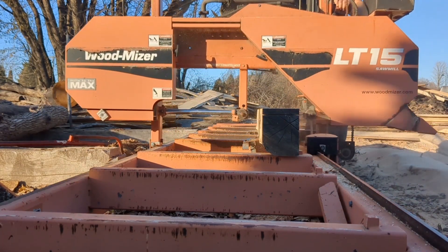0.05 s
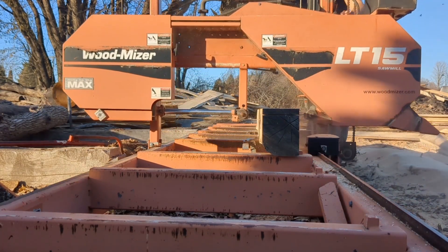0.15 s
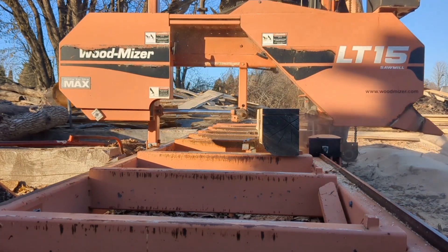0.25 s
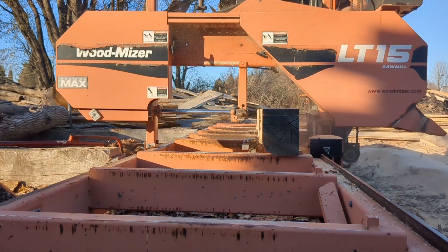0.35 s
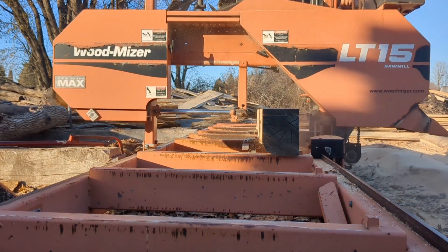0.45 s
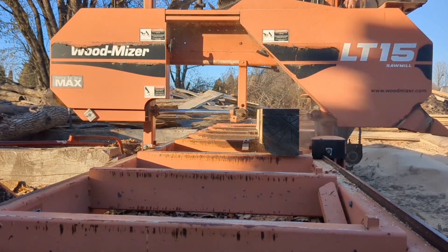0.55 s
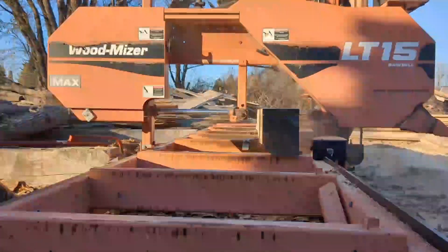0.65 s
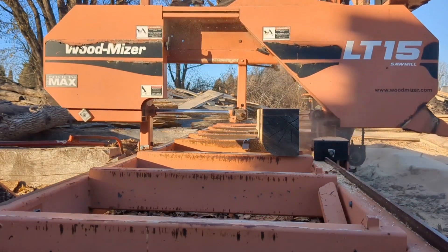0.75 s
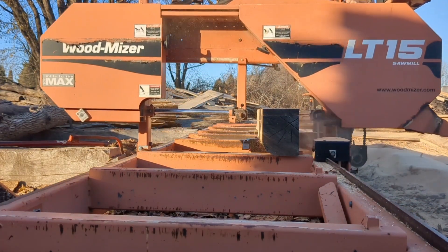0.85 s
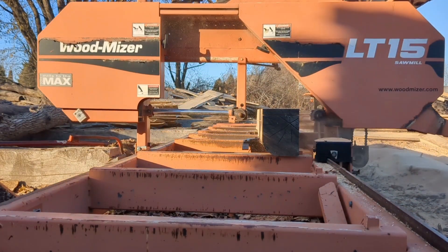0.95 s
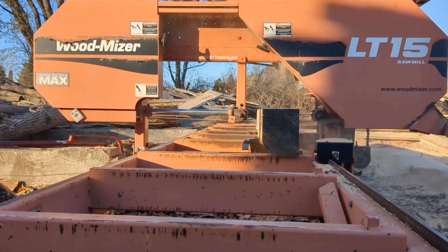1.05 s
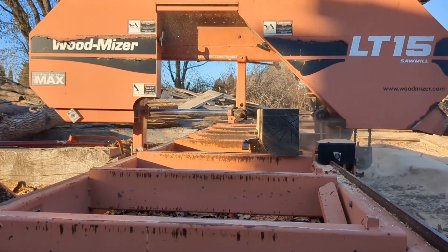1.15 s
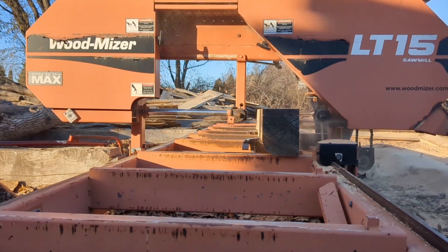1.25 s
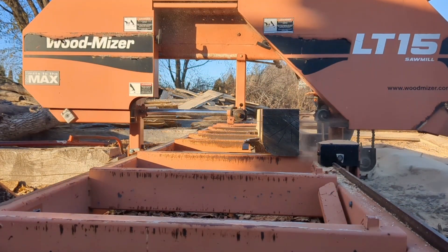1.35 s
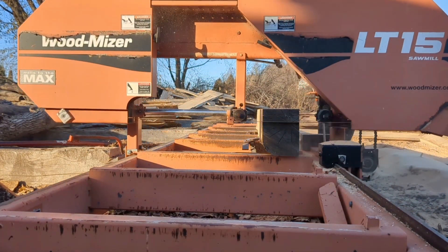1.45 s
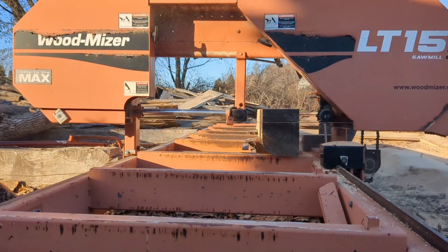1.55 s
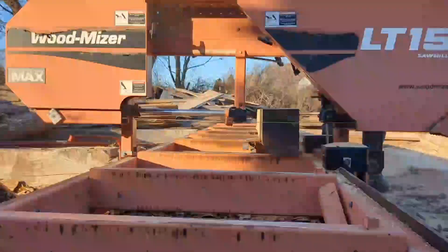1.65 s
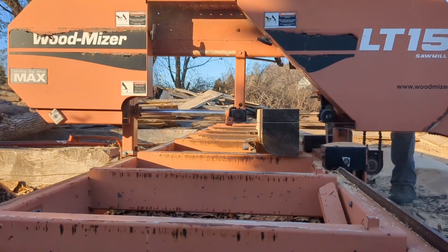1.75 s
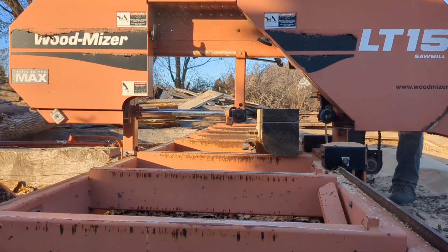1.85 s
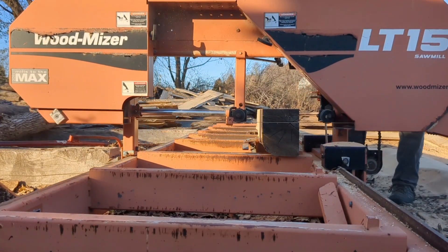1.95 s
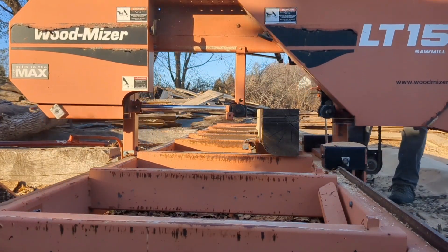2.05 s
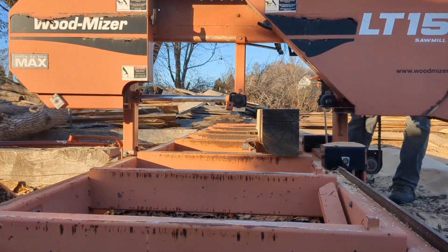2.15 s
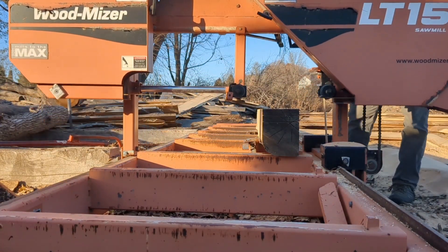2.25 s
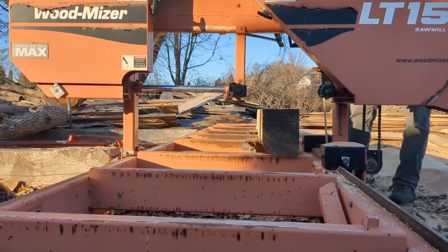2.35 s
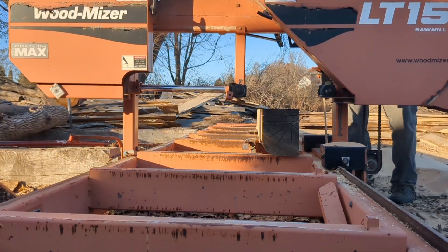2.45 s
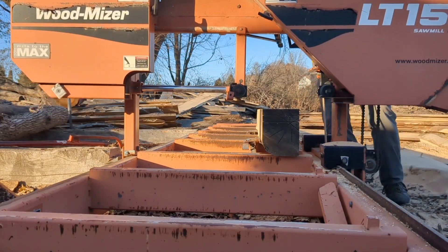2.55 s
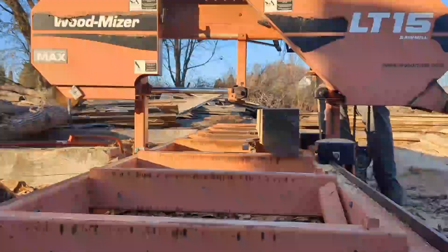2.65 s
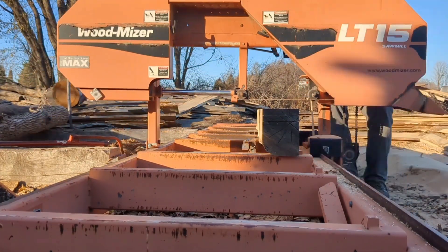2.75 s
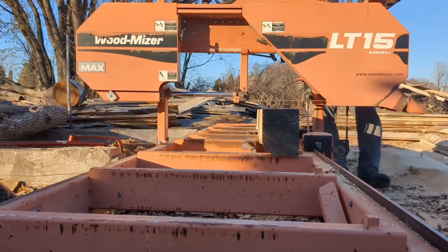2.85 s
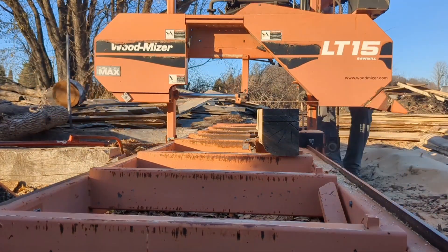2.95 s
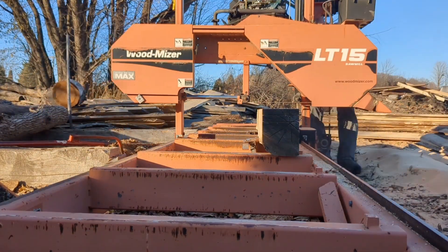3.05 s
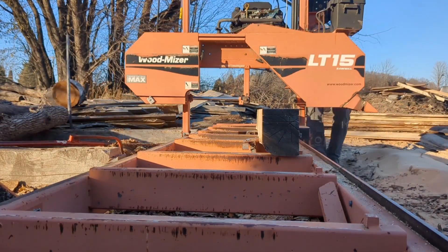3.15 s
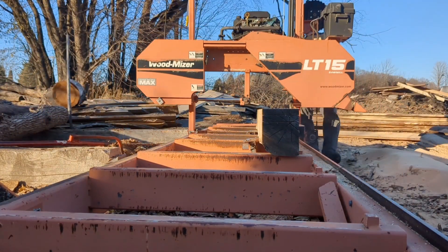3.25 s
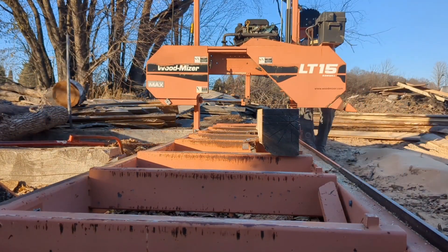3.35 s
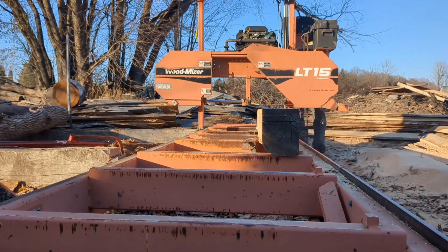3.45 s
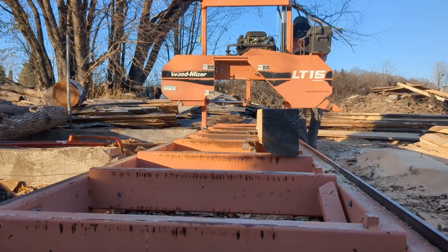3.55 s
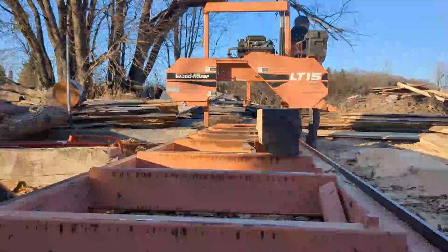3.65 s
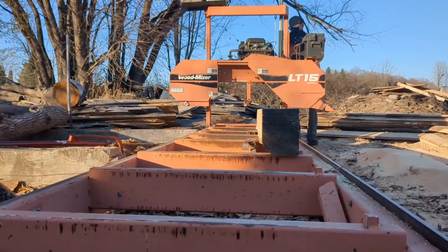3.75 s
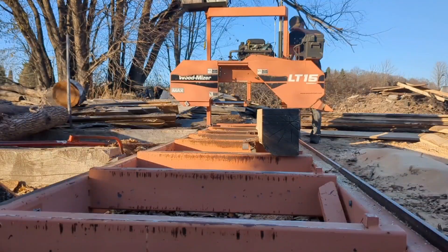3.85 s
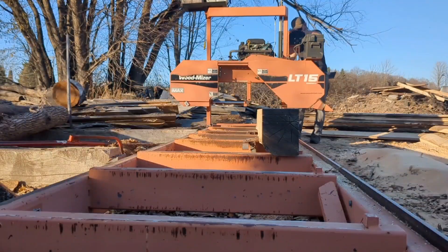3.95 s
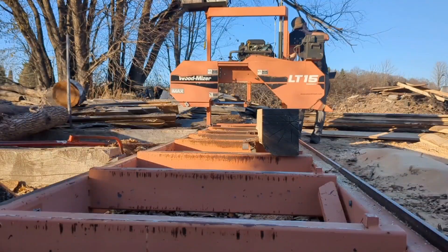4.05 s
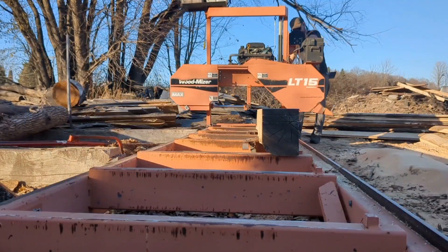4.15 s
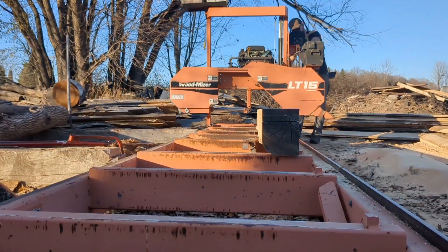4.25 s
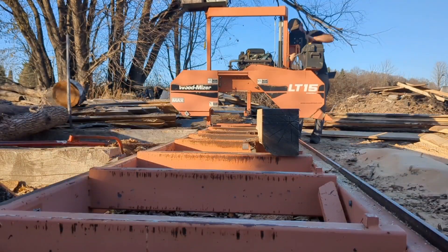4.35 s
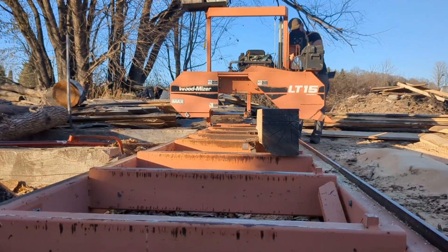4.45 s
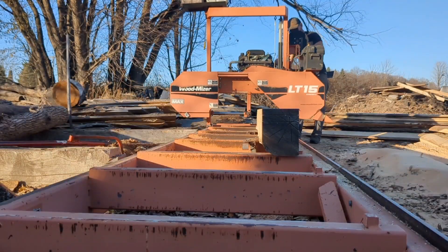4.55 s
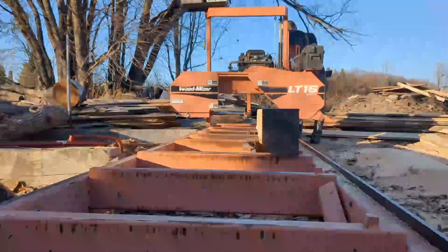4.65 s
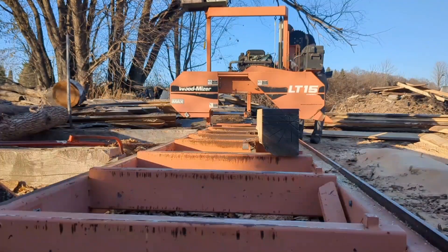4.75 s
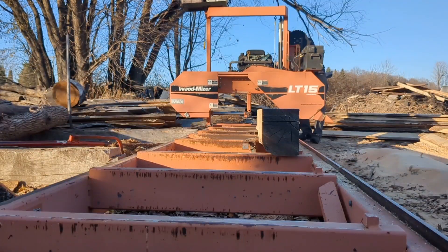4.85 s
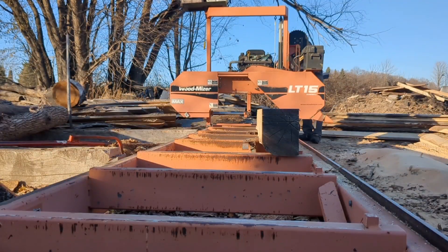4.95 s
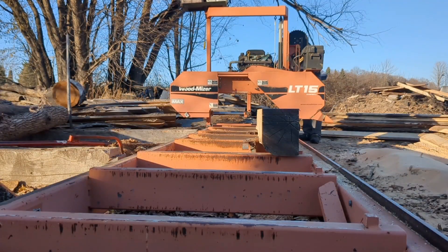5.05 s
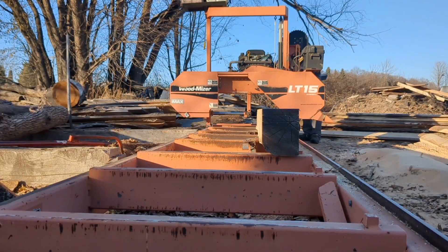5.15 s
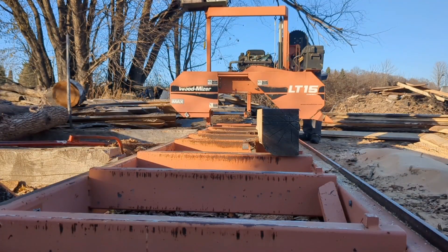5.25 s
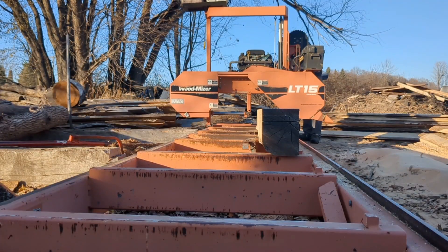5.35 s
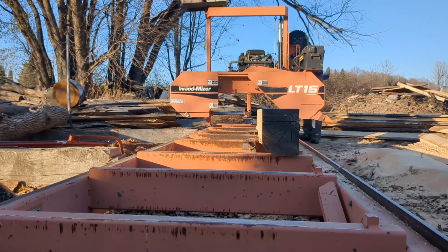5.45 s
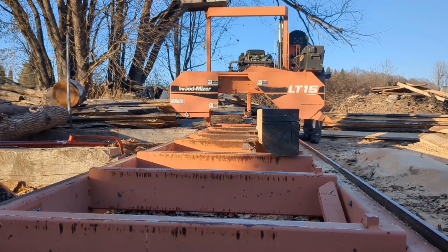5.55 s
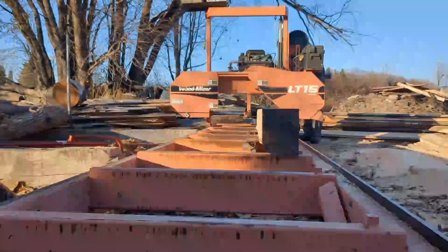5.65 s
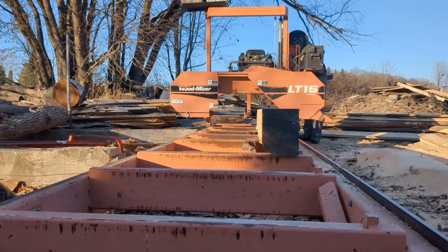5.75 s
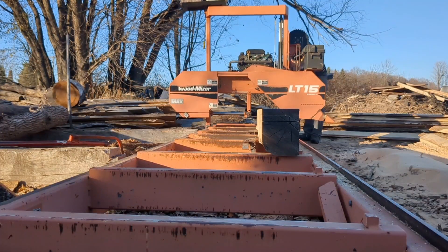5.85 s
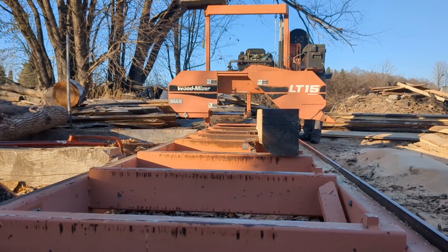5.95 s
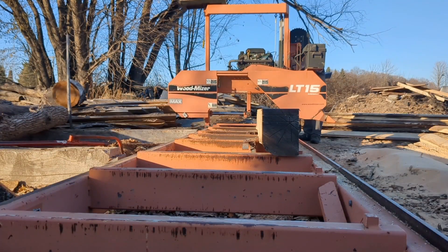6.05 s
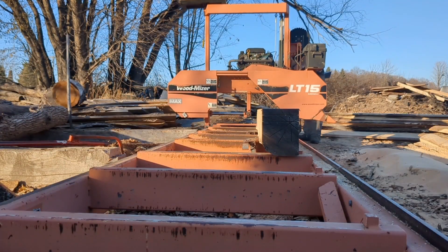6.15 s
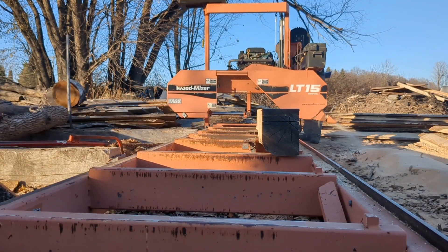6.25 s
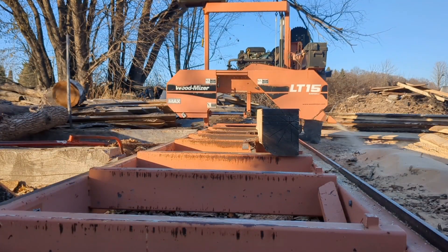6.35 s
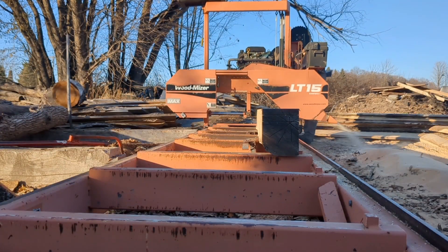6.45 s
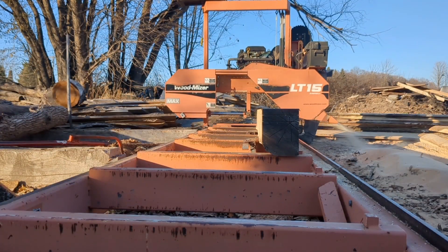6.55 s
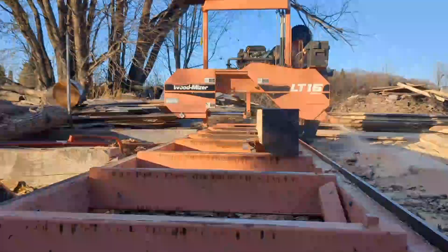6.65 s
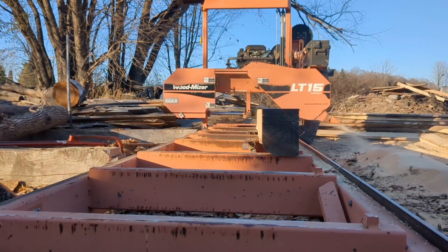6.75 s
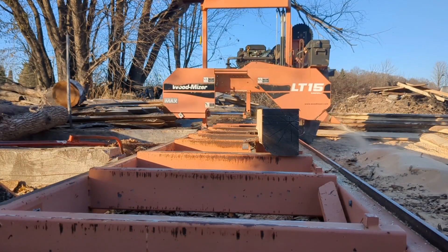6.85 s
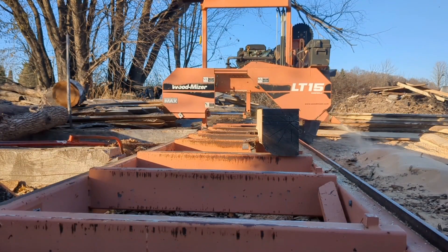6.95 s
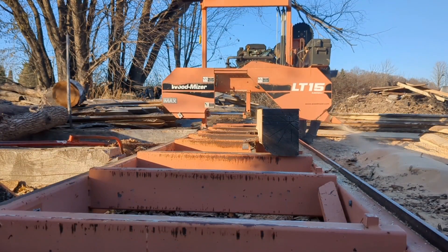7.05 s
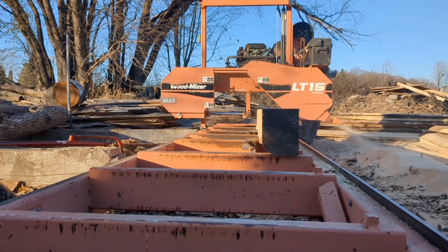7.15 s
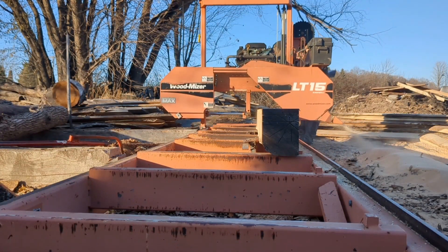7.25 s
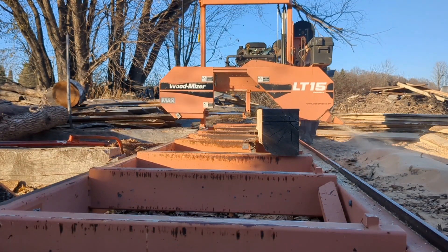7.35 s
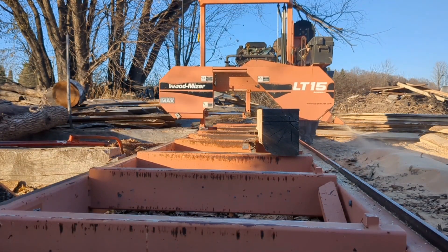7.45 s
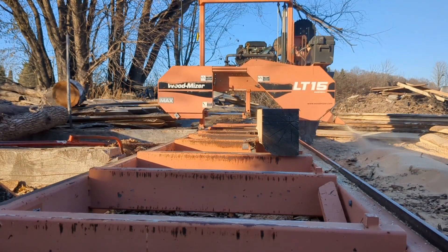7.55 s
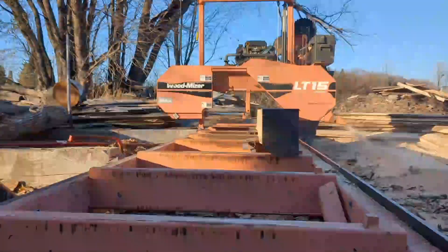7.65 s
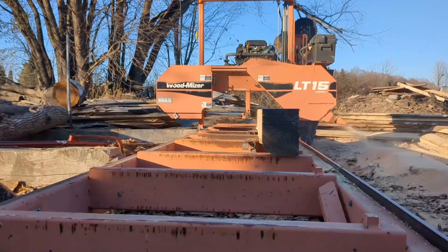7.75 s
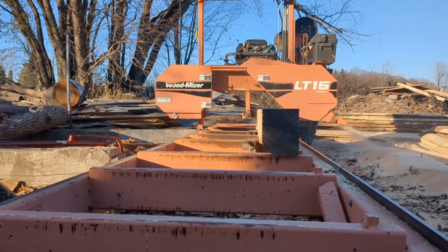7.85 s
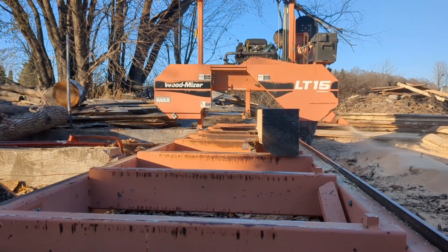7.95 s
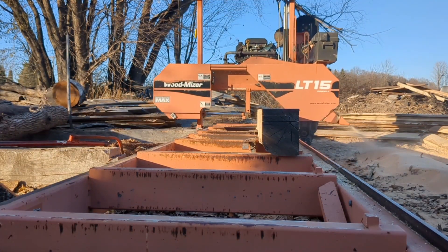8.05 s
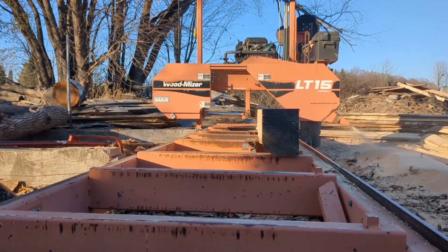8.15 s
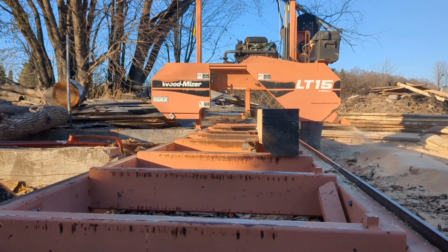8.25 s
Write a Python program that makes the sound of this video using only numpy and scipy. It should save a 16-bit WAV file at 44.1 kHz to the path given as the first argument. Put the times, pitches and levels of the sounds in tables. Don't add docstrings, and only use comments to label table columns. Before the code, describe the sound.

A steady, droning engine and bright tearing hiss of a band blade fill an open yard. After about a second and a half the cut finishes, revs fall to a throbbing idle and the blade coasts to silence with a rail rumble. A sharp metallic clack brings the throttle back up, the belt squeals as it grips, and the saw bites into wood again. Phone microphone at the log bed, slightly smeared.

```python
import sys
import numpy as np
from scipy import signal
from scipy.fft import rfft, irfft
from scipy.io import wavfile
from scipy.ndimage import uniform_filter1d

SR = 44100
rng = np.random.default_rng(int(sys.argv[2]) if len(sys.argv) > 2 else 0)


def magnitude_from_level(level_db):
    exponent = np.asarray(level_db, float) / 20
    return 10 ** exponent


def wav_out(sig):
    wavfile.write(sys.argv[1], SR, np.round(np.clip(np.atleast_2d(sig).T, -1, 1) * 32767).astype(np.int16))


N = 366471
TIME = np.arange(N) / SR
HZ = np.maximum(np.fft.rfftfreq(N, 1 / SR), 1)

HEAD_FAR_S = 4.2

# time in seconds, four-stroke cycles per second.
ENGINE_SPEED = [(0, 30.9), (.8, 30.4), (1.56, 31.2), (1.7, 29), (1.85, 25.2), (2.25, 22), (2.4, 19.5),
                (2.76, 18.7), (3.1, 19.4), (4.72, 18.9), (4.74, 27.2), (4.9, 27.4), (4.97, 30.2),
                (5.08, 29.6), (5.52, 28.4), (5.62, 31.6), (6.2, 30.4), (8.31, 30.4)]
# time in seconds, gas load in dB, valve and belt clatter in dB.
THROTTLE = [(0, -23.5, -24.5), (.4, -25.5, -31), (1.2, -26, -37), (1.45, -28, -27.5), (1.7, -28.5, -25),
            (1.9, -31, -31), (2.2, -32.5, -33.5), (2.8, -31, -29.5), (3.35, -34.5, -31), (3.8, -34.5, -36),
            (4.7, -32.5, -34.5), (4.75, -26, -27.5), (5.05, -26, -27.5), (5.17, -23, -23),
            (5.47, -23.5, -19), (5.56, -25.5, -25.5), (6.05, -24, -24.5), (8.31, -24.5, -29)]
# multiple of the cycle rate, level at full speed in dB, level at idle in dB.
LOW_ORDERS = [(2, 0.5, -14), (3, 0.5, -3.5), (5, 7.5, 8.5)]
# multiple of the cycle rate, level at full speed in dB, level at idle in dB.
HIGH_ORDERS = [(6, 0, 4.5), (7, -9, 6), (8, -7, 4), (9, -18.5, -7.5), (10, -22.5, 4), (11, -20, -6),
               (12, -16, -11.5), (13, -25.5, -9), (16, -27.5, -7.5)]
# centre in Hz, width in Hz, boost in dB.
MUFFLER = [(72.4, 10.5, 4.5), (125.4, 11.4, -11.5)]
MUFFLER_TURN = {6: .7, 7: -2.2, 8: 1.5}
SLIP_TURNS = {2: -1, 3: 1, 6: 2, 7: -1, 8: 1, 9: 3, 11: 2}
# start in seconds, end in seconds, edge in seconds, boost in dB.
SEVENTH_BOOMS = [
    (1.5, 1.75, 0.17, 10.5),
    (4.9, 5.12, .2, 9.5),
    (5.5, 6.1, 0.24, 8.5),
]
# start in seconds, end in seconds, edge in seconds, boost in dB.
OVERRUN_BOOM = [
    (1.71, 1.97, .08, 7.5),
]
# frequency in Hz, level in dB per Hz.
EXHAUST_TONE = [(20, 4), (40, -12), (70, 8), (120, 4), (170, 9.5), (215, 4), (280, -12.5), (360, -2.5),
                (480, -15.5), (700, -50)]
# frequency in Hz, level in dB per Hz.
CLATTER_TONE = [(260, -37), (450, -16.5), (856, -9), (1170, -4), (1510, -9.5), (2130, -6.5), (3430, -15.5),
                (4050, -16), (5790, -29), (11900, -31), (16000, -51)]
# start in seconds, end in seconds, edge in seconds, dB above the blade's plain rub.
CUTS = [
    (-2, 1.45, 0.17, 5.5),
    (6, 5.55, .1, 4),
    (7, 9, 0.036, 2),
    (6.5, 11, 5.4, 4.5),
]
# frequency in Hz, level in dB per Hz.
WOOD_TONE = [(410, -17), (700, -22), (886, -5), (1330, -11), (1750, -5), (2370, -8), (2560, -4),
             (3370, -6.5), (6570, -4.5), (7990, -8), (9350, -6.5), (12600, -22), (16000, -40)]
# time in seconds, whirr level in dB.
WHEEL_LEVEL = [(0, -22), (.4, -21), (1.3, -20), (2.6, -22.5), (3.12, -32), (3.66, -48), (4, -66),
               (4.9, -70), (5.05, -50), (5.16, -40), (5.37, -27.5), (5.58, -22), (6, -25), (6.1, -20),
               (8.31, -21.5)]
# frequency in Hz, level in dB per Hz.
WHIRR_NEAR_TONE = [(4650, -18), (7900, -8), (8210, -47), (8530, 2), (8920, 1.5), (10100, -4), (11100, 2),
                   (12300, -1), (13800, -11), (15100, -16), (16000, -10)]
# frequency in Hz, level in dB per Hz.
WHIRR_FAR_TONE = [(4650, -27), (7900, -7.5), (8210, -12), (8760, 4), (9350, 2.5), (10700, -4), (11300, 0.5),
                  (12600, -2.5), (13900, -14.5), (15300, -16), (16000, -21)]
# time in seconds, level in dB.
SING_LEVEL = [(0, -36), (3.1, -36.5), (3.4, -42), (3.55, -59), (5.2, -62), (5.6, -46), (6.2, -34.5),
              (8.31, -47)]
# frequency in Hz, level in dB.
SING_MODES = [(2480, -1), (3283, -8.5), (1700, -6.5)]
# time in seconds, level in dB.
RAILS_LEVEL = [(0, -25), (1.7, -23.5), (2.36, -31), (3, -22), (3.35, -21.5), (3.65, -25.5), (3.76, -36),
               (5.2, -38.5), (5.7, -29), (8.31, -28.5)]
# frequency in Hz, level in dB per Hz.
RUMBLE_TONE = [(24, -45), (40, -27), (76, -24), (102, -7), (298, -12), (407, -17.5), (615, -17),
               (772, -24.5), (1200, -35), (1560, -46.5), (2640, -120)]
# frequency in Hz, level in dB per Hz.
FRAME_TONE = [(150, -19), (260, 1.5), (355, -6.5), (450, -7.5), (530, -14.5), (700, -15.5), (900, -11.5),
              (1300, -51)]
# frequency in Hz, level in dB per Hz.
YARD_TONE = [(2500, -30.5), (4500, -1), (6000, 0), (11000, -9), (16000, -20)]
# time in seconds, crack in dB, ring over crack in dB, ring pitch in Hz.
KNOCKS = [(4.4398, -28.5, 9, 930), (4.572, -39, 3, 969), (4.605, -38, 2, 1140), (4.6902, -34, 2, 1800),
          (4.7237, -31, 4, 980), (4.7407, -22, 4, 1700), (4.752, -21, 3, 1720), (4.7615, -13.5, -6, 2140),
          (4.7794, -33, -1, 1970), (4.798, -23, 4, 2100), (4.9227, -17, -6, 920), (4.9592, -18, 3, 1170),
          (4.9744, -30, 10, 1260), (5.0444, -29, 10, 1120), (5.1306, -26, 2, 1260)]
# frequency in Hz, level in dB.
KNOCK_TONE = [(600, -30), (1500, 7.5), (5000, 0.5), (8000, -5.5), (12000, -3.5), (14000, -14), (16000, -20)]
# time in seconds, rub in dB, whirr in dB.
SLAPS = [
    (4.75, -37, -51),
    (4.924, -34.5, -41),
    (5.13, -43, -46),
]
# time in seconds, squeal pitch in Hz, level in dB.
BELT_SQUEAL = [(4.95, 1135, -34), (5.05, 1152, -33), (5.17, 1220, -24), (5.34, 1307, -26),
               (5.42, 1494, -29), (5.45, 1700, -25), (5.466, 1740, -16), (5.485, 1710, -32),
               (5.5, 1740, -52)]
# centre in Hz, width in Hz, boost in dB.
BODY_RINGS = [(1040, 26, -2), (1284, 49, 3), (1448, 49, 5), (1700, 66, 2.5), (2524, 45, 6), (8600, 39, -26),
              (8700, 110, 5), (8920, 80, -2.5), (9060, 55, 3), (9300, 150, 4.5), (10100, 170, 6),
              (10770, 100, 2.5)]
# frequency in Hz, likeness from 0 to 1.
PORT_LIKENESS = [(60, 1), (130, 1), (290, 1), (640, 0.76), (1410, 0.69), (3100, 0.66), (5000, 0.4),
                 (6820, 0.19), (9000, 0.23), (11000, 0.35), (13000, 0.6), (15000, .15)]
# frequency in Hz, left minus right in dB.
PORT_LEAN = [(60, -5), (110, 1), (200, 3), (380, 1.0), (700, -1), (1290, -0.5), (2380, -1), (4400, 1),
             (8120, -2), (15000, -17.5)]
# frequency in Hz, radians by which left leads.
PORT_LEAD = [(0, 0), (520, 0.55), (1120, -0.05), (2840, -0.8), (5430, -1.0), (6200, -4.5), (6550, 0.4),
             (8960, 0.5), (10200, 1.1), (11000, 0), (12100, -2.8), (12700, -0.5), (14800, -3), (16200, 2)]


def columns(table):
    s, *rest = np.transpose(table)
    return [np.interp(TIME, s, column) for column in rest]


def across(table, hz=HZ):
    f, value = np.transpose(table)
    return np.interp(np.log(hz), np.log(f), value)


def unit(x):
    return x / np.sqrt(np.mean(x ** 2))


def walk(rate):
    k = int(SR / rate)
    held = np.repeat(rng.standard_normal(N // k + 1), k)
    smooth = uniform_filter1d(uniform_filter1d(held, k), k)
    return unit(smooth[:N])


def spans(table):
    total = 0
    for start, end, edge, db in table:
        inside = np.minimum(TIME - start, end - TIME)
        total = total + db * np.clip(inside / edge + .5, 0, 1)
    return total


def ports(mid, side):
    alike = np.clip(across(PORT_LIKENESS), 0, 1)
    shared = rfft(mid) * np.sqrt((1 + alike) / 2)
    unshared = rfft(side) * np.sqrt((1 - alike) / 2)
    lean_db = across(PORT_LEAN) / 2
    turn = np.exp(.5j * np.interp(HZ, *np.transpose(PORT_LEAD)))
    left = (shared + unshared) * magnitude_from_level(lean_db) * turn
    right = (shared - unshared) * magnitude_from_level(-lean_db) / turn
    return np.array([left, right])


def rush(tone, lo_hz, hi_hz, grit_db, flicker_db, swell_db):
    grit = magnitude_from_level(grit_db * uniform_filter1d(rng.exponential(size=N), size=12))
    rings_db = sum(db / (1 + ((HZ - f) / (width / 2)) ** 2) for f, width, db in BODY_RINGS)
    both = ports(*(grit * rng.standard_normal((2, N)))) * magnitude_from_level(across(tone) + rings_db)
    in_band = (HZ > lo_hz) * (HZ < hi_hz)
    both = both / np.std(irfft(both.mean(axis=0) * in_band, N))
    place = np.clip(np.log(HZ / lo_hz) / np.log(hi_hz / lo_hz), 0, 1) * 4
    total = 0
    for k in range(5):
        share = np.clip(1 - abs(place - k), 0, 1)
        total = total + irfft(both * share, N) * magnitude_from_level(flicker_db * walk(18))
    return total * magnitude_from_level(swell_db * walk(40))


def exhaust(cycle, hz, load_db):
    idle = np.clip((29 - hz) / 9, 0, 1)
    high_db = load_db + 3 * (TIME > HEAD_FAR_S) * (1 - idle)
    orders = [(load_db, *row) for row in LOW_ORDERS] + [(high_db, *row) for row in HIGH_ORDERS]
    out = rush(EXHAUST_TONE, 40, 480, 1.2, 1.5, .8) * magnitude_from_level(high_db - 2.5)
    crank = 2 * np.pi * cycle + .13 * walk(15)
    slip = 2 * np.pi * 2.2 * TIME + .7 * walk(17)
    for base_db, k, full_db, idle_db in orders:
        db = base_db + full_db + idle * (idle_db - full_db)
        own = (.12 + .06 * k * ((k > 8) + idle * (k > 5))) * walk(20)
        phase = k * crank + SLIP_TURNS.get(k, 0) * slip + MUFFLER_TURN.get(k, 0) + own
        pipe_db = sum(g / (1 + ((k * hz - f) / (width / 2)) ** 2) for f, width, g in MUFFLER)
        boom_db = (k == 7) * spans(SEVENTH_BOOMS) + (k == 3) * spans(OVERRUN_BOOM)
        waver_db = 0.65 * walk(30) + 0.65 * walk(5)
        out = out + magnitude_from_level(db + 2.5 + pipe_db + boom_db + waver_db) * np.sin(phase)
    return out


def valve_clatter(cycle, clatter_db):
    first = np.exp(-(cycle % 1) / 0.39)
    second = np.exp(-((cycle - 3 / 8) % 1) / 0.04)
    beat = 1 + 0.16 * (first + second)
    return rush(CLATTER_TONE, 800, 5500, 1.6, 0.2, 1.0) * unit(beat) * magnitude_from_level(clatter_db - 3.5)


def teeth_in_wood(whirr_db, surge_db):
    rub_db = -30.5 + 0.75 * (whirr_db + 20)
    level = magnitude_from_level(rub_db + spans(CUTS) + surge_db) + slaps(column=1)
    return rush(WOOD_TONE, 3000, 7500, 4.8, 0.71, 0.64) * level * magnitude_from_level(-1.0)


def blade_wheels(whirr_db, surge_db):
    near = rush(WHIRR_NEAR_TONE, 9450, 13000, 4.7, 0.66, 0.42)
    far = rush(WHIRR_FAR_TONE, 9400, 13800, 3.8, 1.6, 0.28)
    level = magnitude_from_level(whirr_db + surge_db) + slaps(column=2)
    flutter_db = 0.36 * (walk(55) - walk(30))
    return np.where(TIME < HEAD_FAR_S, near, far) * level * magnitude_from_level(flutter_db - 1.0)


def blade_ring():
    total = 0
    for hz, db in SING_MODES:
        phase = 2 * np.pi * hz * TIME + 1.1 * walk(70)
        total = total + magnitude_from_level(db + 3.2 * walk(30)) * np.sin(phase)
    return magnitude_from_level(columns(SING_LEVEL)[0]) * total


def rails_and_frame():
    rolling = rush(RUMBLE_TONE, 190, 780, 0.98, 1.2, 0.91)
    humming = rush(FRAME_TONE, 254, 660, 0.4, 2.6, 0.78)
    level = magnitude_from_level(columns(RAILS_LEVEL)[0] - 4.5)
    return np.where(TIME < HEAD_FAR_S - .5, rolling, humming) * level


def yard_air():
    return rush(YARD_TONE, 4000, 12000, 1.1, .6, .4) * magnitude_from_level(-58)


def knocks():
    ring, crack, t = np.zeros(N), np.zeros(N), TIME[:4000]
    rise = 1 - np.exp(-t / 0.00062)
    ring_fade = rise * np.exp(-t / 0.0076)
    crack_fade = rise * (np.exp(-t / 0.0038) + 0.52 * np.exp(-t / 0.018))
    for s, db, ring_db, hz in KNOCKS:
        i = int(s * SR)
        ring[i:i + len(t)] += magnitude_from_level(db + ring_db - 4) * np.sin(2 * np.pi * hz * t) * ring_fade
        crack[i:i + len(t)] += magnitude_from_level(db - 7.5) * crack_fade
    noise = irfft(ports(*rng.standard_normal((2, N))) * magnitude_from_level(across(KNOCK_TONE)), N)
    return ring + crack * unit(noise)


def slaps(column):
    total = 0
    for row in SLAPS:
        since = TIME - row[0]
        total = total + magnitude_from_level(row[column]) * (since > 0) * np.exp(-np.abs(since) / .03)
    return total


def belt():
    hz, db = columns(BELT_SQUEAL)
    phase = 2 * np.pi * np.cumsum(hz * (1 + .03 * walk(60))) / SR + 1.2 * walk(300)
    slipping = (TIME > BELT_SQUEAL[0][0]) * (TIME < BELT_SQUEAL[-1][0])
    return magnitude_from_level(db - 2.0 + 2.1 * walk(70)) * np.sin(phase) * slipping


def scene():
    hz = columns(ENGINE_SPEED)[0] * (1 + .006 * walk(6))
    cycle = np.cumsum(hz) / SR
    load_db, clatter_db = columns(THROTTLE)
    whirr_db, = columns(WHEEL_LEVEL)
    surge_db = .25 * walk(16)
    engine = exhaust(cycle, hz, load_db) + valve_clatter(cycle, clatter_db)
    blade = teeth_in_wood(whirr_db, surge_db) + blade_wheels(whirr_db, surge_db) + blade_ring()
    return engine + blade + rails_and_frame() + yard_air() + knocks() + belt()


def top_cut(x):
    return signal.sosfilt(signal.butter(12, 16630, fs=SR, output="sos"), x)


def record(dry):
    dip = np.cos(2 * np.pi * (np.arange(N) / 1024 - .26))
    bass = signal.sosfiltfilt(signal.butter(2, 400, fs=SR, output="sos"), dry)
    joined = bass * (1 + 0.042 * dip) + (dry - bass) * (1 + 0.14 * dip)
    rounded = np.tanh(.6 * joined) / .6
    mix = signal.sosfilt(signal.ellip(14, .3, 60, 15730, fs=SR, output="sos"), rounded)
    return top_cut(mix)


dry = scene()
out = record(dry)
wav_out(out)
```